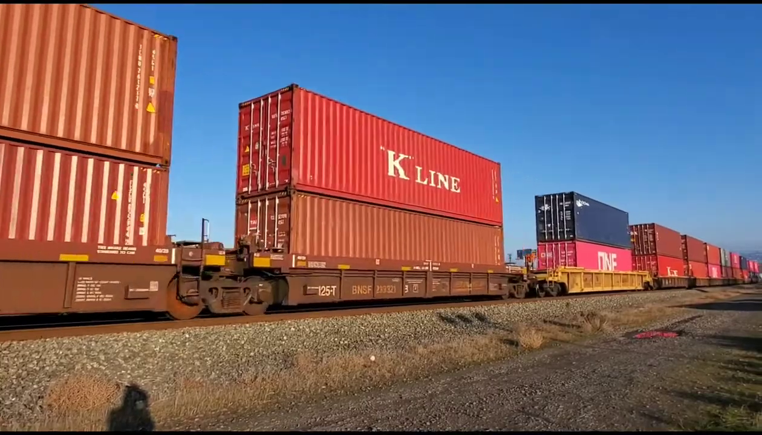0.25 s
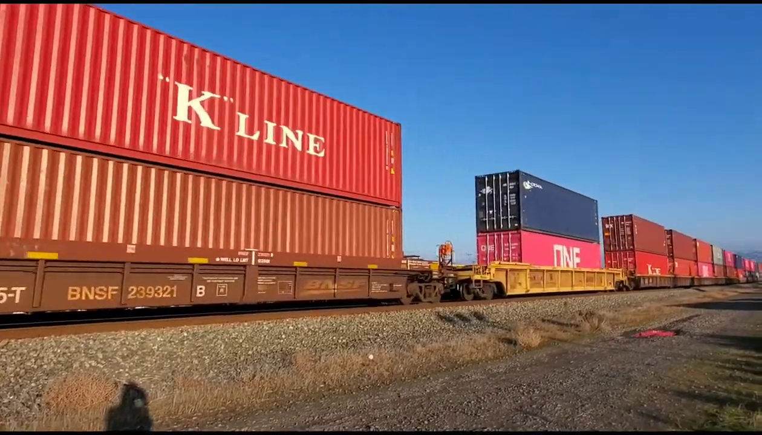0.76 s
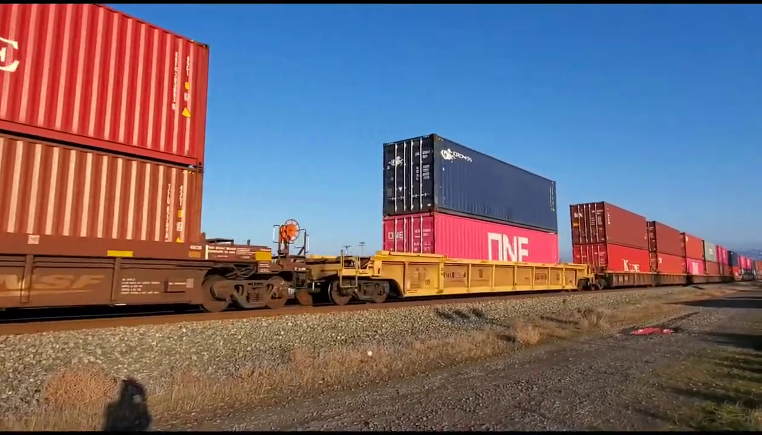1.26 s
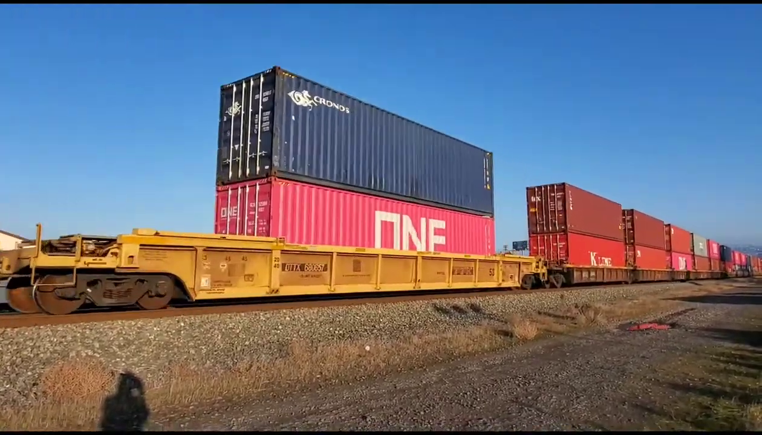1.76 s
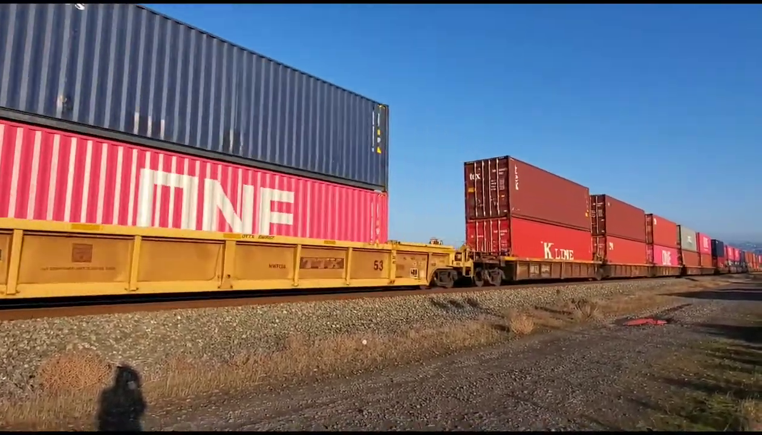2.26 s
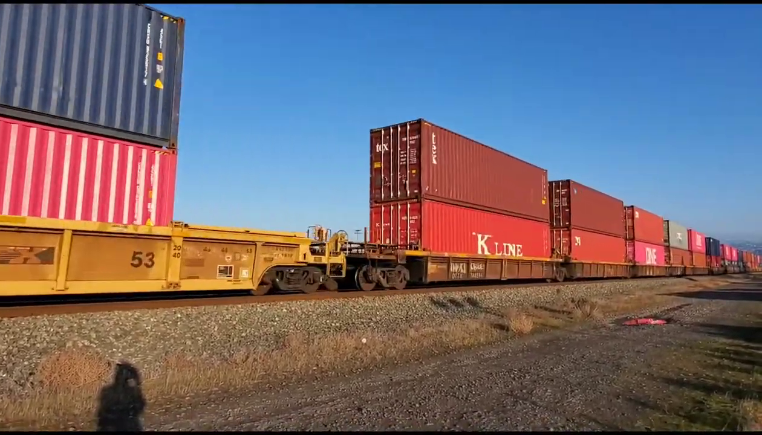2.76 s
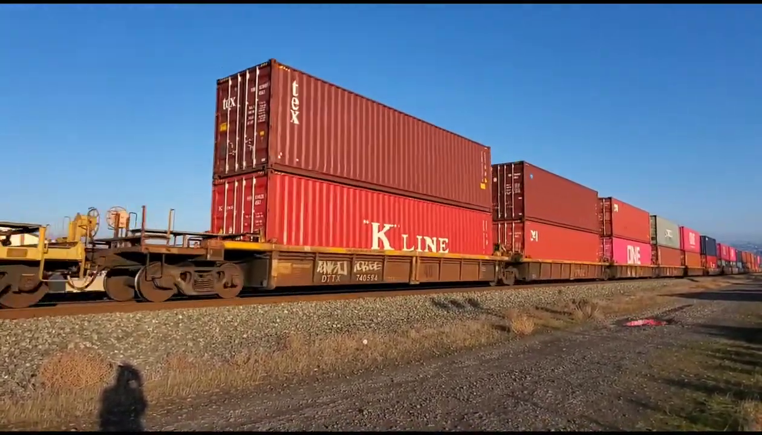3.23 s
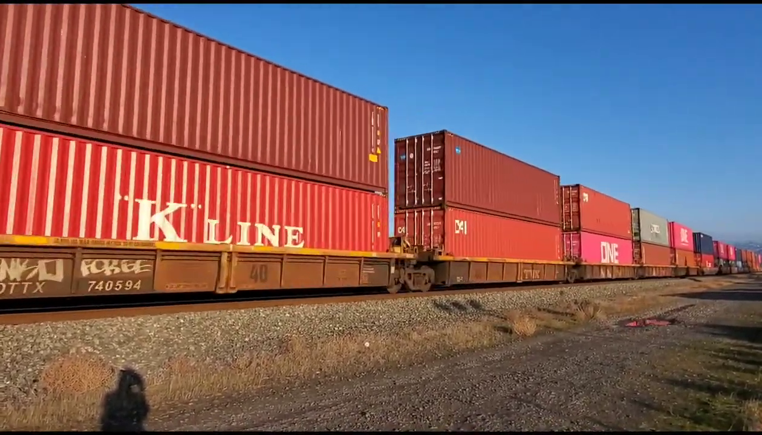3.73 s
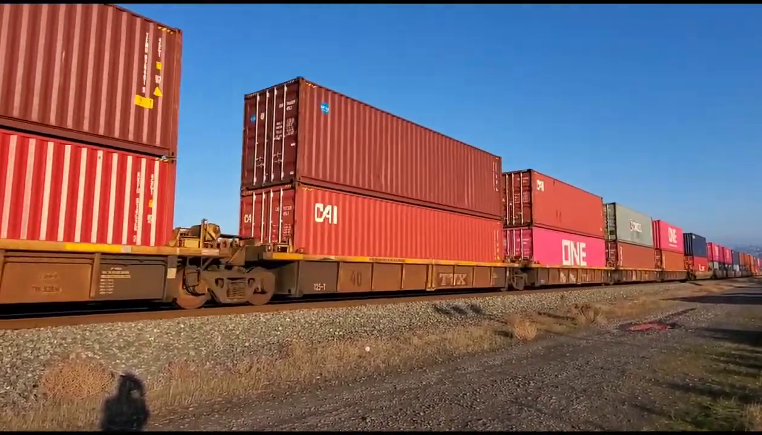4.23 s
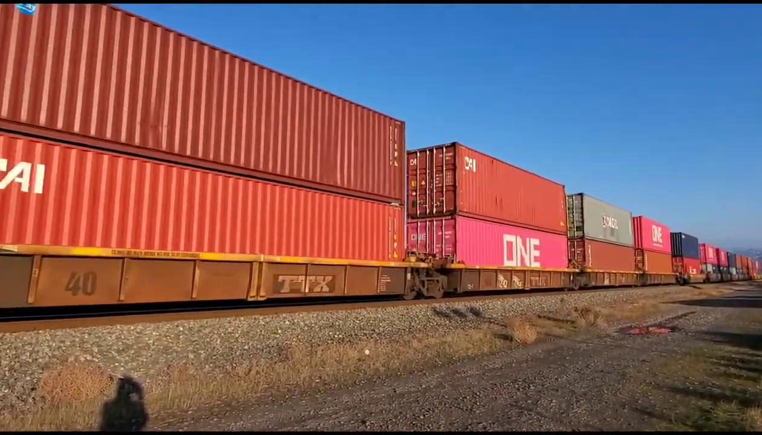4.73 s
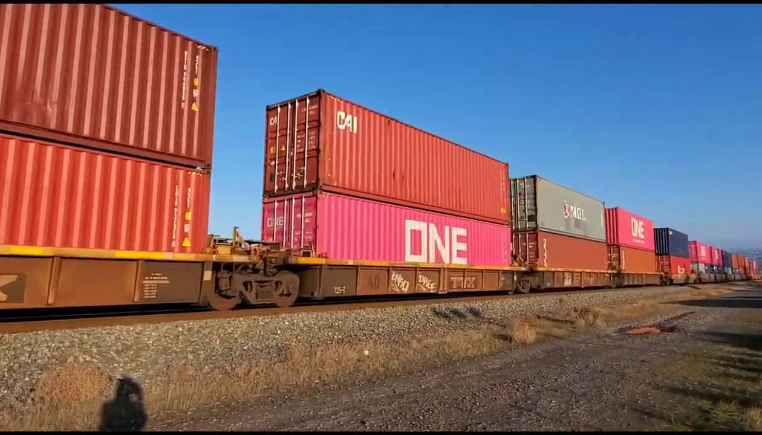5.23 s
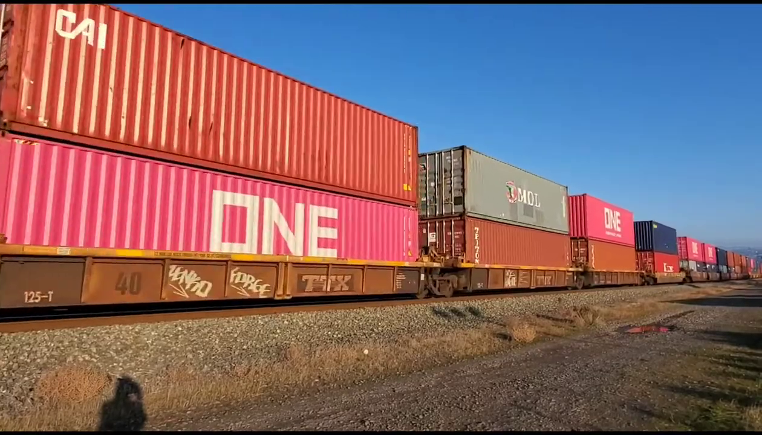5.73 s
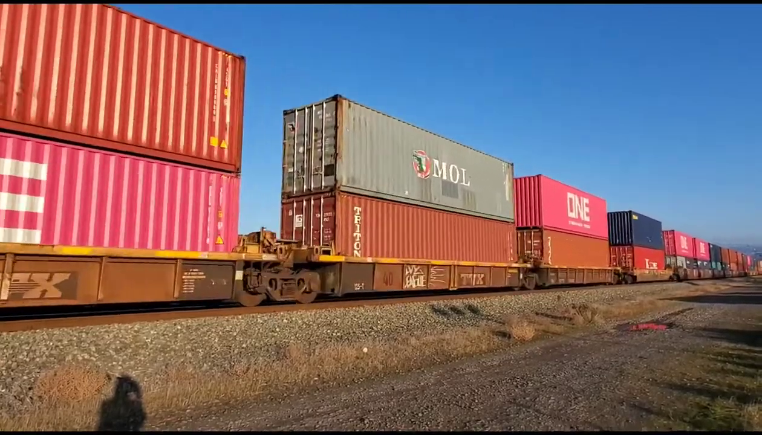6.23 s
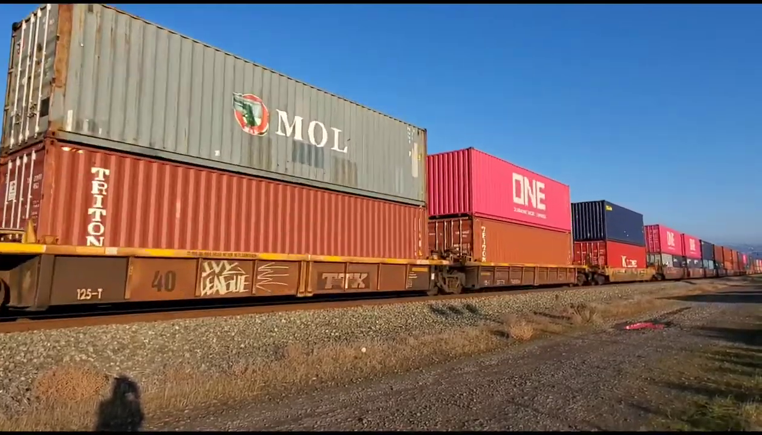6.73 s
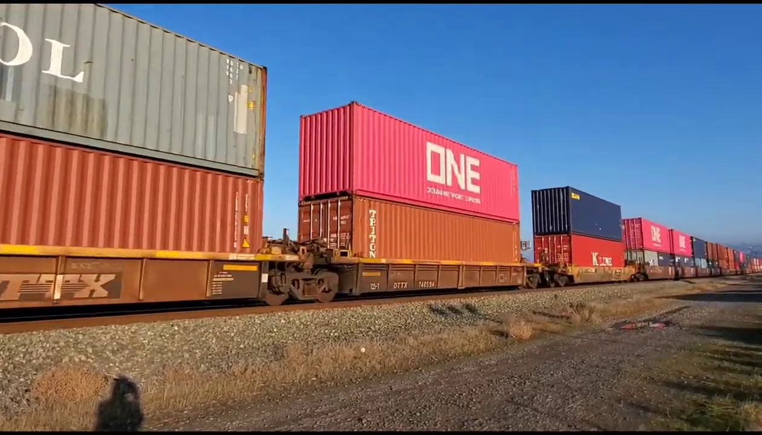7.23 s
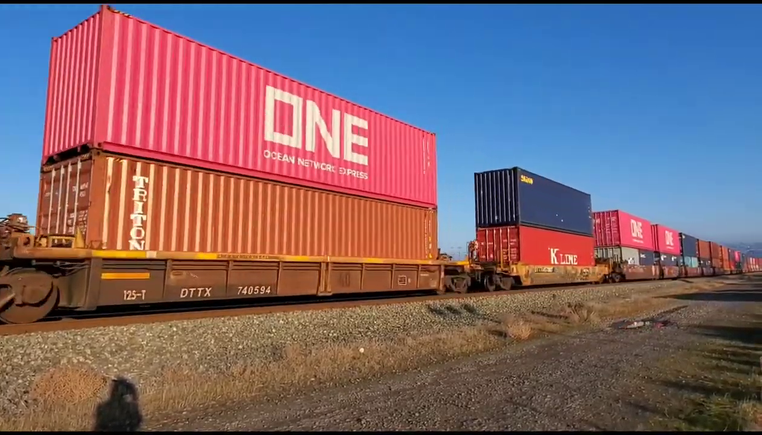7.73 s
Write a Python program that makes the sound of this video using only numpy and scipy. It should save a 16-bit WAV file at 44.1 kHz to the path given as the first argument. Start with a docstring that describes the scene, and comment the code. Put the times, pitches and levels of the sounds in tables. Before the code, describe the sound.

Outdoors beside the track, a long container train passes close to a hand-held stereo microphone. Heavy bass rumble, wheel roar and hiss pulse with each set of wheels. A high raspy squeal peaks around two seconds, drops in pitch and fades, among ringing flanges and small clinks. The left side is muffled by a fingertip, which pops free briefly, then knocks twice. Rumbling continues, thinner on the right.

```python
"""Container train passing close by

Rumble, wheel roar and hiss are shaped noise; one squealing wheel is a rasping tone that falls in pitch as it
passes. Rubbed wheels ring, loose steel clinks, car bodies drum low, wheels thud over a rail joint. A fingertip
covers the left port of the hand-held microphone, slips off with a pop for a moment, then knocks on it twice; a
finger briefly shades the right port. A limiter ducks overloads and holds after big ones (squeal peak, knocks);
late on, the right loses its bass."""
import sys
import numpy as np
from scipy import signal
from scipy.fft import rfft, irfft, next_fast_len
from scipy.io import wavfile
from scipy.ndimage import uniform_filter1d, minimum_filter1d

SR = 44100
rng = np.random.default_rng(int(sys.argv[2]) if len(sys.argv) > 2 else 0)


def digitize_waveform(pressure):
    """Quantize a signal to 16-bit integers and store it at the path in sys.argv[1].

    Rows of a 2-D input are taken as channels; values are limited to [-1, 1].
    """
    field = np.atleast_2d(pressure).T
    bounded = np.clip(field, -1, 1)
    quanta = np.round(bounded * 32767).astype(np.int16)
    wavfile.write(sys.argv[1], SR, quanta)


N = 351898
T = np.arange(N) / SR

# rolling noise before the bogie levels: f/Hz, density/dB per Hz
ROLLING_SPECTRUM = [(20, -67), (42, -40), (70, -30.5), (115, -43.5), (170, -45.5), (260, -45.5), (400, -58),
                    (640, -60), (1100, -67.5), (1400, -67.5), (3200, -70), (5500, -76), (7800, -82.5),
                    (9000, -79.5), (10500, -82.5), (15000, -89.5)]
# left-right likeness of the rolling noise: f/Hz, likeness 0-1
PORT_LIKENESS = [(40, 0.99), (120, 0.98), (300, 0.87), (600, 0.7), (1000, 0.09), (3000, 0.12), (12000, .05)]
# the loudest wheels lie now to one side, now to the other: t/s, delay of left port/ms
BEARING = [(0, -0.35), (1.2, -0.12), (2, -0.055), (3.3, 0.11), (3.9, 0.12), (4.3, -0.25), (4.8, -0.22),
           (5.3, 0.05), (6, 0.39), (7.98, 0.075)]
# bogies going by: t abeam/s, rumble/dB, car-body boom/dB, wheel roar/dB, rail hiss/dB
BOGIES = [(0, -3, -2.5, 2.5, -2.5), (0.901, -3, -3, -1, -1.5), (1.6, -6.5, -3, 0, 1.5),
          (2.2, -18, -13, -6, 4), (3.25, -9.5, -4, 0.5, -0.5), (3.75, -1.5, 3, 2.5, 0.5),
          (4.8, -0.5, -11.5, -0.5, -2), (5.7, -2.5, -3, -6, -8), (6.92, -2, 4.5, -1.5, 2.5),
          (7.72, 3, 0, 2, 4.5)]
# distance along the track at half power: rumble/m, boom/m, roar/m, hiss/m
BOGIE_REACH_M = [9.2, 7.57, 6.85, 6.25]
# brief swells and sags of the rumble: t/s, level/dB
LURCHES = [(0.09, 6.5), (0.22, 5), (0.38, -5.5), (0.502, 5), (1.95, -2.5), (2.1, -2.5), (2.7, 2), (5.33, 5),
           (7.27, 3.5), (7.44, -2.5), (7.6, 3.5), (7.86, 3.5)]
LURCH_S = 0.056  # half length, to 1/e
# brief surges and slacks of the wheel roar: t/s, half length/s, level/dB
SURGES = [(5.712, 0.06, 1), (6.837, 0.06, -0.5), (7.327, 0.052, -3.5), (7.475, 0.019, 3.5),
          (7.528, 0.025, -3.5), (7.624, 0.05, 2), (7.96, 0.05, 1)]
SURGE_HISS = 0.58  # share of a surge, in dB, that the hiss follows
# many wheels farther off, independent of the bogie levels: f/Hz, width/Hz, peak density/dB per Hz
FAR_WHEELS = [(1057, 260, -68), (1886, 140, -66), (2500, 260, -69), (3157, 130, -67.5), (8930, 900, -83)]
# an out-of-round wheel throbs once a turn while near
THROB_AT_S, THROB_SPREAD_S, THROB_DB, TURN_S = 4.51, 0.29, 8.5, 0.17
# squealing wheel as heard from DISTANCE_M: t/s, pure tone/dB, rasp/dB, octave/dB
SQUEAL = [(0, -28.5, -20, -49), (0.25, -16.5, -25, -45), (0.75, -23.5, -22, -42), (1.42, -18.5, -18.5, -33),
          (1.6, -15.5, -17.5, -21.5), (1.93, -16, -22, -33.5), (2.4, -17, -22.5, -36.5),
          (2.75, -28, -32, -42), (3.05, -40, -30, -32.5), (3.4, -35.5, -33, -37), (4.2, -38.5, -38.5, -48),
          (4.7, -48.5, -40, -56), (5.2, -55, -63, -68)]
SQUEAL_HZ, SPEED_M_S, DISTANCE_M, ABEAM_S = 6684, 14.8, 10.5, 1.98
RAIL_WIDTH_HZ = 90
# the squeal locks in and flares: t/s, half length/s, tone level/dB
FLARES = [(1.779, 0.064, 17.5), (2.993, 0.093, 17), (4.285, 0.046, 14), (4.58, 0.028, 14.5)]
# squeal at the left port: weaker before abeam, stronger after; limit and distance scale
SIDE_DB, SIDE_M = 20, 40.4
# wheel modes: f/Hz, width/Hz, rubbed lightly/dB, rubbed hard/dB
WHEEL_MODES = [(1790, 90, -40, -51), (2060, 40, -56, -42), (2530, 125, -36, -37), (2710, 30, -56, -45),
               (2860, 28, -57, -46), (3260, 55, -52, -42), (3380, 60, -53, -44), (4020, 110, -48, -42),
               (4500, 90, -51, -54), (4820, 55, -51, -43), (5110, 55, -60, -44), (5360, 35, -60, -48),
               (9500, 220, -68, -39.5), (10500, 150, -65, -47)]
# flanges rub the rail: t/s, length/s, t wheel abeam/s, pitch factor, hardness 0-1, level re mode/dB
FLANGE_RUBS = [(0.2, 0.45, 0.2, 1.02, 0.2, -5.5), (0.85, 0.72, 1.98, 1.005, 0.6, -4),
               (1.47, 0.55, 1.98, 1, 1, 0), (1.8, 1.05, 1.98, 1.01, 0.25, -2.5),
               (2.72, 0.5, 3.2, 0.985, 0.1, -0.5), (3.16, 0.88, 3.7, 0.99, 0.1, 0.5),
               (4.0, 0.95, 4.3, 0.96, 0, -6)]
# envelope evenness (0 flutters freely, 1 dead steady); swell and fade time
GRIP, RING_FADE_S = 0.6, 0.05
# one steel part sings alone: t/s, length/s, starting f/Hz, width/Hz, level/dB
SQUEAKS = [(0, 0.29, 1620, 40, -39), (0.249, 0.42, 1610, 40, -40), (0.017, 0.23, 1970, 100, -38.5),
           (0, 0.32, 3250, 84, -42), (0.03, 0.12, 5020, 23, -41), (0.235, 0.15, 2590, 40, -39),
           (0.55, 0.35, 3190, 65, -40), (1.434, 0.1, 2610, 50, -30), (1.72, 0.14, 2890, 23, -34),
           (2.77, 0.14, 2520, 140, -33), (1.74, 0.29, 2533, 29, -33.5), (3.24, 0.26, 2570, 120, -42),
           (3.68, 0.34, 2490, 110, -44), (3.603, 0.17, 3370, 31, -35), (3.833, 0.078, 9160, 200, -33),
           (3.848, 1.07, 1796, 32, -42), (4.517, 0.18, 3670, 16, -42), (4.733, 0.13, 3620, 25, -40.5),
           (4.876, 0.12, 11600, 400, -45), (5.153, 0.065, 8790, 360, -24), (7.419, 0.54, 1018, 250, -37.5)]
# low drumming sounds: car bodies, wheels thudding over a rail joint late on, and a small finger blip at 5.27 s:
# t/s, length/s, f/Hz, level/dB
DRUMMING = [(0, 0.24, 229.4, -28), (1.15, 0.61, 245, -26.5), (3.347, 0.72, 323, -29.5),
            (5.27, 0.044, 1010, -35), (6.45, 0.79, 140, -24), (6.929, 0.018, 635, -26),
            (7.446, 0.059, 264, -17), (7.565, 0.037, 255, -18), (7.73, 0.061, 637, -29),
            (7.77, 0.1, 238.6, -18.5), (7.945, 0.047, 556, -32)]
# fingertip on the left port: t/s, seal (0 open, 1 shut; beyond 1 tighter still)
FINGERTIP_SEAL = [(0, 0.14), (.1, 0.21), (.3, 0.48), (1.1, 0.73), (1.5, 1.09), (2.6, 1.22), (3.2, 1.13),
                  (4.21, 0.97), (4.228, 0.13), (4.59, 0.077), (4.66, 0.91), (5.3, 1.09), (5.6, 1.07),
                  (7.98, 1.11)]
# loss through the fingertip at seal 1: f/Hz, level/dB
FINGERTIP_LOSS = [(150, 1.5), (400, -4.5), (650, -4), (1000, -9.5), (1500, -16.5), (2400, -24.5),
                  (4100, -25.5), (5500, -41), (7200, -37), (9600, -26.5), (13500, -53.5)]
# open left port relative to the right: f/Hz, level/dB
OPEN_PORT = [(150, -0.5), (900, 2.5), (1600, 5.5), (3300, 3.5), (5300, 7), (9000, 0), (12000, 8),
             (14500, 10)]
# finger over the right port: t/s, cover (0 open, 1 shut; beyond 1 tighter still)
FINGER_COVER = [(1.8, 0.056), (1.93, 0.64), (2.05, 0.88), (2.4, 1.3), (2.74, 0.91), (2.84, 0.58),
                (2.98, 0.16)]
# loss behind that finger at cover 1: f/Hz, level/dB
FINGER_LOSS = [(900, -0.5), (1800, -5), (4000, -11.5), (6700, -18.5), (10000, -34), (13500, -20.5)]
# ringing of the half-open gap under it: f/Hz, level/dB
GAP_RESONANCE = [(1500, -0.5), (4000, 9.5), (6700, 7), (10000, -1)]
# clinks of loose steel: t/s, level/dB, t60/s, centre f/Hz
CLINKS = [(2.957, -13, 0.014, 1900), (3.285, -21.5, 0.13, 3000), (7.572, -26.5, 0.27, 1700)]
# pop as the fingertip leaves the port, then two fingertip knocks:
# t/s, jolt before decay/dB, skin rub before decay/dB
POP_AND_KNOCKS = [(4.218, 1, -14), (5.37, 17.5, -21), (5.5224, 22.5, -15)]
# fingertip scrapes off the port and back on: t/s, half length/s, level/dB
SCRAPES = [(4.24, 0.018, -33), (4.606, 0.016, -29)]
# right channel after THIN_S: f/Hz, level/dB
THIN_S = 5.908
THIN_RESPONSE = [(140, -15), (230, -9), (300, -11.5), (400, -8), (550, -0.5)]
# overall level, dipping briefly; end values hold outside: t/s, level/dB
LEVEL_DIP = [(5.905, -2.5), (5.912, -14.5), (5.95, -4.5), (6.05, -2)]
EDGE_HZ = 15500


def amp(db):
    """Decibels to gain."""
    return 10 ** (np.asarray(db) / 20)


def unit(x):
    """Scales to rms 1."""
    return x / np.sqrt(np.mean(abs(x) ** 2) + 1e-20)


def curve(rows, t):
    """Every column of a time table, read at times t."""
    s, *columns = np.transpose(rows)
    return [np.interp(t, s, c) for c in columns]


def spectrum(points, hz):
    """Reads (Hz, value) points on a log-frequency axis."""
    f, value = np.transpose(points)
    return np.interp(np.log(hz + 1), np.log(f + 1), value)


def add(mix, s, sound):
    """Mixes a sound in at time s."""
    part = mix[..., max(round(s * SR), 0):][..., :sound.shape[-1]]
    part += sound[..., :part.shape[-1]]


def colour(x, points):
    """A fixed filter given as (Hz, dB) points."""
    return irfft(rfft(x) * amp(spectrum(points, np.fft.rfftfreq(N, 1 / SR))), N)


def flutter(count, width_hz, order=2):
    """Complex random envelope, rms 1, of a resonance of that width."""
    size = next_fast_len(count)
    hz = np.fft.fftfreq(size, 1 / SR)
    z = rng.standard_normal(size) + 1j * rng.standard_normal(size)
    return unit(np.fft.ifft(z / (1 + (2 * hz / width_hz) ** 2) ** (order / 2))[:count])


def bell(t, s, half_s, order=2):
    """A swell of height 1 around time s, down to 1/e at half_s."""
    return np.exp(-abs((t - s) / half_s) ** order)


def along(abeam_s, t):
    """Metres that a wheel has travelled past the microphone."""
    return SPEED_M_S * (t - abeam_s)


def doppler(x):
    """Pitch factor of a wheel x metres past."""
    return 1 / (1 + SPEED_M_S / 343 * x / np.hypot(x, DISTANCE_M))


def levels(t):
    """Rumble, boom, roar, hiss in dB: bogie powers add by distance, then lurches, throb and surges."""
    reach_m = np.array(BOGIE_REACH_M)[:, None]
    power = sum(amp(db)[:, None] ** 2 / (1 + (along(s, t) / reach_m) ** 2) for s, *db in BOGIES)
    rumble, boom, roar, hiss = 10 * np.log10(power)
    lurch = sum(db * bell(t, s, LURCH_S) for s, db in LURCHES)
    turning = np.cos(2 * np.pi * (t - THROB_AT_S) / TURN_S)
    throb = THROB_DB * bell(t, THROB_AT_S, THROB_SPREAD_S) * turning
    surge = sum(db * bell(t, s, half_s) for s, half_s, db in SURGES)
    return rumble + lurch + throb, boom, roar + surge, hiss + SURGE_HISS * surge


def rolling(size, patchy_db, flicker_db, glint_db=0):
    """Noise of many wheels and car bodies in drifting patches, built as short-time spectra."""
    hop = size // 4
    t, hz = np.arange(N // hop + 5) * hop / SR, np.fft.rfftfreq(size, 1 / SR)
    a, b, c, d, patches = rng.standard_normal((5, len(t), len(hz)))
    same = np.clip(spectrum(PORT_LIKENESS, hz), 0, 1)
    right = a + 1j * b
    left = same * right + np.sqrt(1 - same ** 2) * (c + 1j * d)
    left *= np.exp(-2j * np.pi * np.outer(curve(BEARING, t)[0], hz) / 1000)
    # pitch range ruled by rumble, boom, roar, hiss: f/Hz, share
    ranges = [[(100, 0.95), (170, 0.0078)],
              [(100, 0.01), (170, 1.0), (330, 0.82), (520, 0.0076)],
              [(330, 0), (520, 1), (1400, 1), (3200, 0)],
              [(1400, 0), (3200, 1)]]
    db = spectrum(ROLLING_SPECTRUM, hz)
    db = db + sum(np.outer(level, spectrum(share, hz)) for level, share in zip(levels(t), ranges))
    far = sum((amp(peak_db) / (1 + (2 * (hz - f) / width) ** 2)) ** 2 for f, width, peak_db in FAR_WHEELS)
    db = 10 * np.log10(amp(db) ** 2 + far)
    patches = uniform_filter1d(uniform_filter1d(patches, size=14, axis=0), size=4, axis=1)
    db = db + patchy_db * unit(patches)
    # steel parts ring for a moment: narrow, short peaks above 1 kHz
    glints = unit(uniform_filter1d(rng.standard_normal(db.shape), size=18, axis=0))
    db = db + glint_db * np.clip(glints - 1, 0, 2) * (hz > 1000)
    flicker = unit(uniform_filter1d(rng.standard_normal(len(t)), size=4))
    db = db + flicker_db * flicker[:, None]
    z = np.array([left, right]) * amp(db)
    noise = signal.istft(z.transpose(0, 2, 1), nperseg=size, noverlap=size - hop)[1][:, :N]
    return noise * np.sqrt(SR / size * 3 / 2)


def steadied(x, level_db, steady=0.7, smooth_s=0.09):
    """Evens out chance swells, so that x keeps close to its level curve."""
    power = uniform_filter1d(((x * amp(-level_db)) ** 2).mean(0), size=round(smooth_s * SR))
    return x / unit(np.sqrt(abs(power))) ** steady


def train(bass_hz=125, split_hz=380, bass_db=0, low_db=0, high_db=-0.4):
    """Even, heavy rumble at the bottom, booming car bodies above it, livelier roar on top."""
    hz, t = np.fft.rfftfreq(N, 1 / SR), T[::256]
    deep, share = 1 / (1 + (hz / bass_hz) ** 8), 1 / (1 + (hz / split_hz) ** 8)
    low = rfft(rolling(size=2048, patchy_db=1.5, flicker_db=-0.65)) * np.sqrt(share)
    high = rfft(rolling(size=1024, patchy_db=1.05, flicker_db=0.59, glint_db=5.0)) * np.sqrt(1 - share)
    rumble = steadied(irfft(low * deep, N), np.interp(T, t, levels(t)[0]))
    boom_and_roar = irfft(amp(low_db) * low * (1 - deep) + amp(high_db) * high, N)
    return amp(bass_db) * rumble + boom_and_roar


def squeal(rasp_hz=290, echo_db=-4, waver=0.74, waver_hz=30, octave_tone_db=-2, octave_rasp_hz=450,
           octave_echo_db=-7, rail_db=-10):
    """Stick-slip on one wheel: a tone in a rasping band, with its octave, Doppler-shifted as it goes by."""
    x = along(ABEAM_S, T)
    turn = np.exp(2j * np.pi * np.cumsum(SQUEAL_HZ * doppler(x)) / SR)
    unshifted = np.exp(2j * np.pi * SQUEAL_HZ * T)
    spread_hz = 2 * SQUEAL_HZ * SPEED_M_S / 343
    flare_db = sum(db * bell(T, s, half_s, order=4) for s, half_s, db in FLARES)
    tone_db, rasp_db, octave_db = curve(SQUEAL, T) + np.outer([1, 0.3, 0.2], flare_db)
    ports = []
    for port_db in (SIDE_DB * np.tanh(x / SIDE_M), 0):
        # ground and car sides reflect the tone, so it wavers differently at each port
        tone = unit(1 + waver * flutter(N, waver_hz))
        first = amp(tone_db) * tone + amp(rasp_db) * flutter(N, rasp_hz)
        octave = unit(amp(octave_tone_db) * tone + flutter(N, octave_rasp_hz, order=3))
        second = amp(octave_db) * octave
        # echoes from up and down the track carry every Doppler shift at once
        echo = amp(rasp_db + echo_db) * flutter(N, 2 * spread_hz, order=8) * unshifted
        echo += amp(octave_db + octave_echo_db) * flutter(N, 2 * spread_hz, order=8) * unshifted ** 2
        # a thin octave line stays at rest pitch, as if sung by the rail
        echo += amp(octave_db + rail_db) * flutter(N, RAIL_WIDTH_HZ) * unshifted ** 2
        wave = (first * turn + second * turn ** 2 + echo).real
        ports.append(np.sqrt(2) * amp(port_db) * wave)
    return np.array(ports) * DISTANCE_M / np.hypot(x, DISTANCE_M)


def ring(hz, width_hz, chatter_db=2.5, chatter_hz=70):
    """A rubbed mode at both ports swells, holds while it chatters, follows the pitch curve and fades."""
    t, turn = np.arange(len(hz)) / SR, np.exp(2j * np.pi * np.cumsum(hz) / SR)
    wander = np.array([flutter(len(hz), width_hz) for port in range(2)])
    sound = unit((turn * wander / (abs(wander) + 1e-9) ** GRIP).real)
    slips = np.arange(0, t[-1] + 1 / chatter_hz, 1 / chatter_hz)
    chatter = unit(amp(chatter_db * np.interp(t, slips, rng.standard_normal(len(slips)))))
    return sound * chatter * signal.windows.tukey(len(hz), min(2 * RING_FADE_S / t[-1], 1))


def rings(sag_per_s=0.022):
    """Flanges ring passing wheels' modes, their balance set by hardness; lone squeaks sag in pitch."""
    out = np.zeros((2, N))
    for s, length_s, abeam_s, pitch, hard, db in FLANGE_RUBS:
        shift = pitch * doppler(along(abeam_s, np.arange(s, s + length_s, 1 / SR)))
        for hz, width_hz, light_db, hard_db in WHEEL_MODES:
            mode_db = light_db + hard * (hard_db - light_db)
            add(out, s, amp(db + mode_db) * ring(hz * shift, width_hz))
    for s, length_s, hz, width_hz, db in SQUEAKS:
        sag = 1 - sag_per_s * np.arange(0, length_s, 1 / SR)
        add(out, s, amp(db) * ring(hz * sag, width_hz))
    return out


def drumming(width_hz=70, left_db=0.0, right_db=-1):
    """Car bodies, wheels at a rail joint, and once a finger, sound briefly: a fluttering pitch, the same wave
    at both ports."""
    out = np.zeros(N)
    for s, length_s, hz, db in DRUMMING:
        t = np.arange(0, length_s, 1 / SR)
        drum = unit((flutter(SR, width_hz)[:len(t)] * np.exp(2j * np.pi * hz * t)).real)
        add(out, s, amp(db) * drum * np.sin(np.pi * np.sqrt(t / length_s)))
    return out * amp([[left_db], [right_db]])


def covered(x, port):
    """Filters x by port(hz, t), in dB."""
    hz, t, z = signal.stft(x, SR, nperseg=512, noverlap=384)
    return signal.istft(z * amp(port(hz, t)), SR, nperseg=512, noverlap=384)[1][:N]


def left_port(hz, t):
    """The fingertip takes the treble from the left port, the more the tighter it seals."""
    loss_db = np.outer(spectrum(FINGERTIP_LOSS, hz), curve(FINGERTIP_SEAL, t)[0])
    return spectrum(OPEN_PORT, hz)[:, None] + loss_db


def right_port(hz, t, gap_shut=1.0):
    """A finger dulls the right port, which sounds hollow while partly covered."""
    cover = curve(FINGER_COVER, t)[0]
    partly = np.sin(np.pi * np.clip(cover / gap_shut, 0, 1)) ** 2
    return np.outer(spectrum(FINGER_LOSS, hz), cover) + np.outer(spectrum(GAP_RESONANCE, hz), partly)


def clinks():
    """Short broad bursts from chains and couplers."""
    out, t = np.zeros((2, N)), np.arange(SR // 4) / SR
    for s, db, t60, hz in CLINKS:
        band = signal.butter(1, [hz / 2, min(hz * 2, SR / 3)], "bandpass", fs=SR, output="sos")
        burst = unit(signal.sosfilt(band, rng.standard_normal((2, len(t)))))
        add(out, s, amp(db - 60 * t / t60) * burst)
    return out


def pop_and_knocks(snap_s=0.00052, slowing=3.2, decay_s=0.0049, rise_s=.00008, rub_hz=2500):
    """A pressure jolt in the port, each swing slower and weaker than the last, and a short rub of skin."""
    out, t = np.zeros(N), np.arange(SR // 10) / SR
    jolt = -np.sin(np.pi * np.log(1 + t / snap_s) / np.log(slowing))
    envelope = np.exp(-t / decay_s) * (1 - np.exp(-t / rise_s))
    dull = signal.butter(2, rub_hz, fs=SR, output="sos")
    for s, db, rub_db in POP_AND_KNOCKS:
        rub = amp(rub_db) * unit(signal.sosfilt(dull, rng.standard_normal(len(t))))
        add(out, s, (amp(db) * jolt + rub) * envelope)
    return out


def scrapes(grains_per_s=1800, low_hz=2000, high_hz=5500):
    """Skin catches and slips on the rim of the left port in tiny grains."""
    grains = rng.standard_normal(N) * (rng.random(N) < grains_per_s / SR)
    band = signal.butter(2, [low_hz, high_hz], "bandpass", fs=SR, output="sos")
    envelope = sum(amp(db) * bell(T, s, half_s) for s, half_s, db in SCRAPES)
    return unit(signal.sosfilt(band, grains)) * envelope


def scene(low_cut_hz=31):
    """The train at two ports, the left one under a fingertip."""
    low_cut = signal.butter(4, low_cut_hz, "highpass", fs=SR, output="sos")
    left, right = signal.sosfilt(low_cut, train()) + squeal() + rings() + drumming() + clinks()
    left = covered(left, left_port) + pop_and_knocks() + scrapes()
    return np.array([left, covered(right, right_port)])


def falling(db, rate_db_s):
    """Follows rises at once and falls at a limited rate."""
    return np.maximum.accumulate(db + rate_db_s * T) - rate_db_s * T


def ducking(over_db, recover_db_s=170, hold_s=1.164, hold_share=1.9, knee_db=3.5, most_db=6.0,
            release_db_s=42):
    """Limiter in dB: ducks ahead of each overload; after a big one, holds up to most_db, then lets go."""
    peak_db, size = -minimum_filter1d(-over_db, size=260), round(hold_s * SR)
    # largest peak of the past hold_s
    recent_db = -minimum_filter1d(-peak_db, size=size, origin=(size - 1) // 2, mode="constant")
    held_db = np.clip(hold_share * (recent_db - knee_db), 0, most_db)
    fast, slow = falling(peak_db, recover_db_s), falling(held_db, release_db_s)
    return uniform_filter1d(np.maximum(fast, slow), size=130)


def record(dry):
    """Bass cut on the right, a brief dip, a look-ahead limiter and the band limit."""
    left, right = dry
    thin = np.clip((T - THIN_S) / 0.013, 0, 1)
    right = right + thin * (colour(right, THIN_RESPONSE) - right)
    x = np.array([left, right]) * amp(curve(LEVEL_DIP, T)[0])
    over_db = np.maximum(20 * np.log10(abs(x).max(0) + 1e-9), 0)
    limited = x * amp(-ducking(over_db))
    low_pass = signal.firwin(511, EDGE_HZ, window=("kaiser", 9), fs=SR)
    return signal.oaconvolve(limited, low_pass[None], "same")


dry = scene()
out = record(dry)
digitize_waveform(out)
```